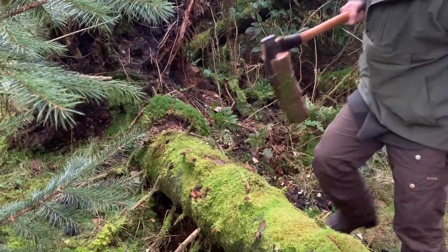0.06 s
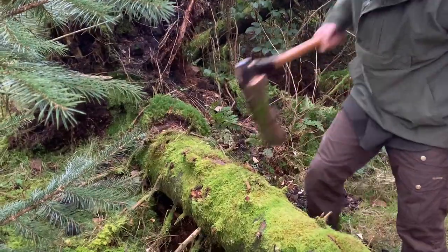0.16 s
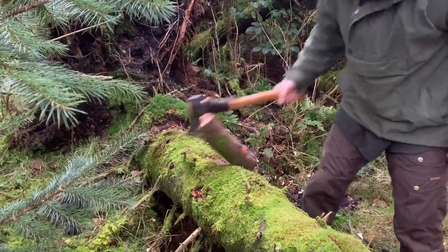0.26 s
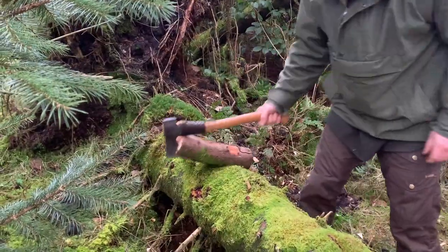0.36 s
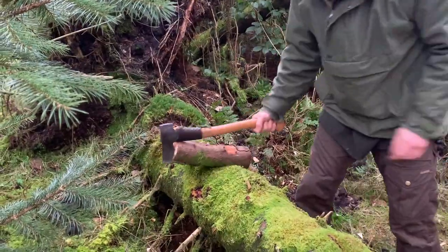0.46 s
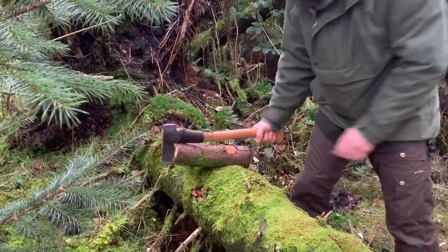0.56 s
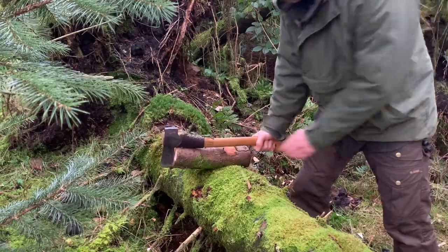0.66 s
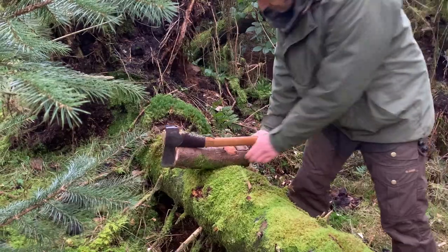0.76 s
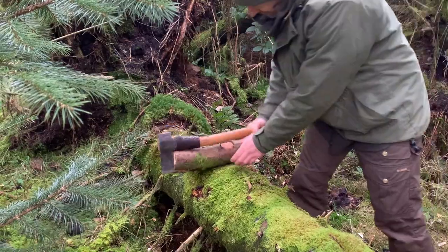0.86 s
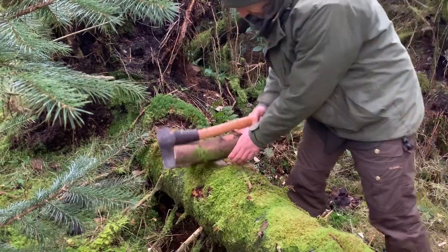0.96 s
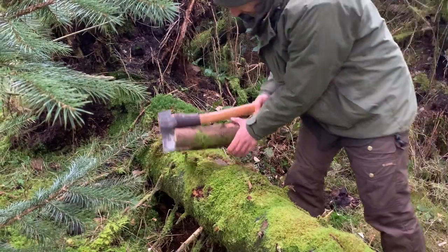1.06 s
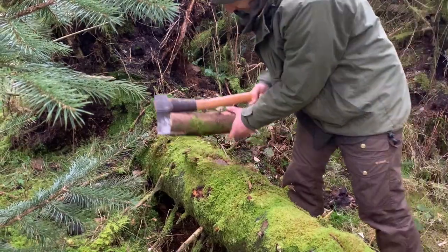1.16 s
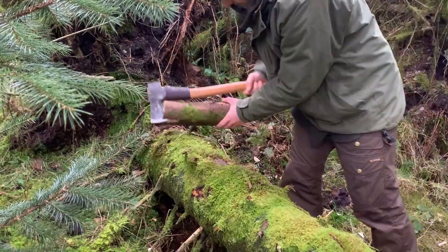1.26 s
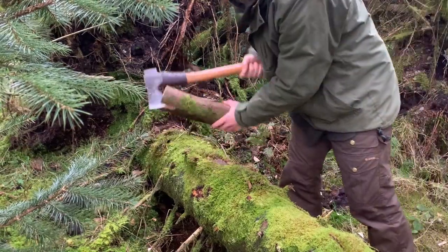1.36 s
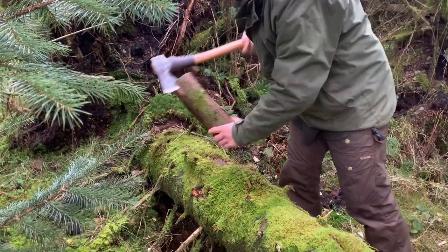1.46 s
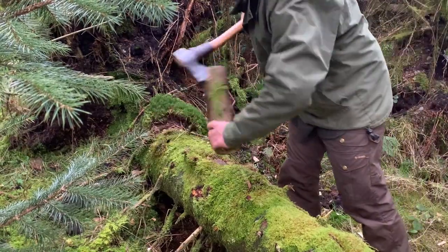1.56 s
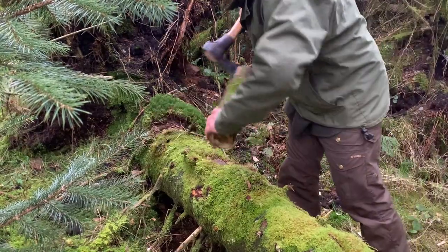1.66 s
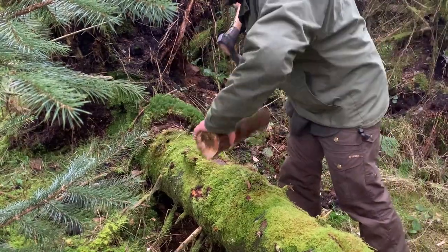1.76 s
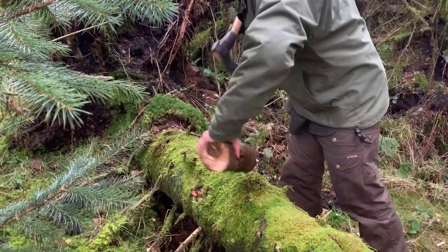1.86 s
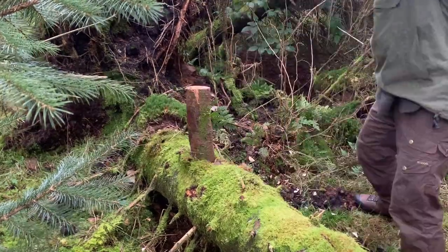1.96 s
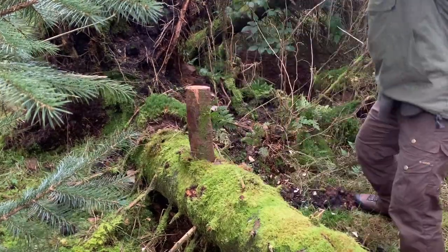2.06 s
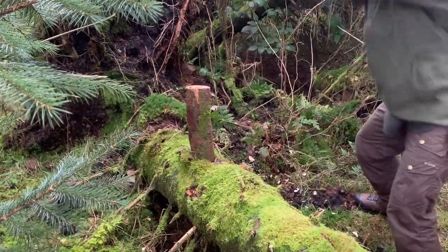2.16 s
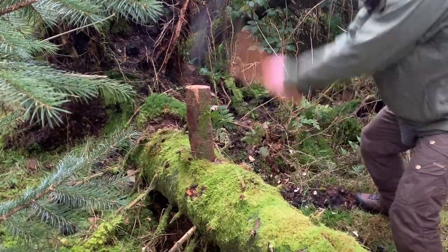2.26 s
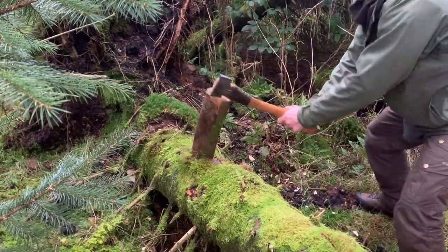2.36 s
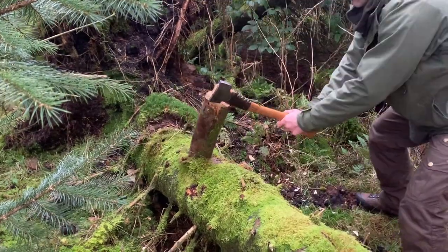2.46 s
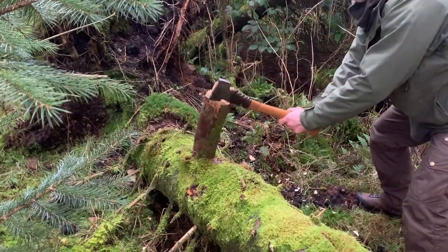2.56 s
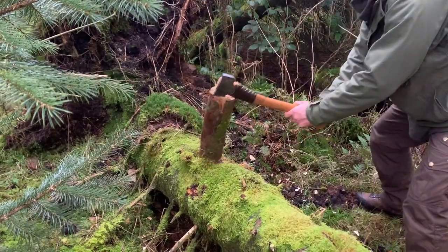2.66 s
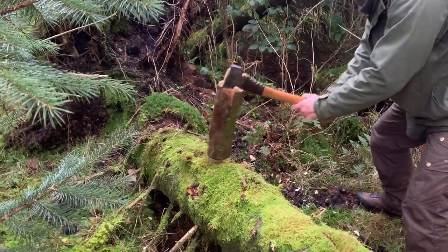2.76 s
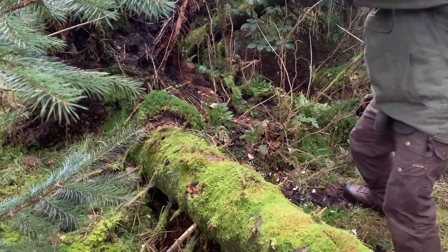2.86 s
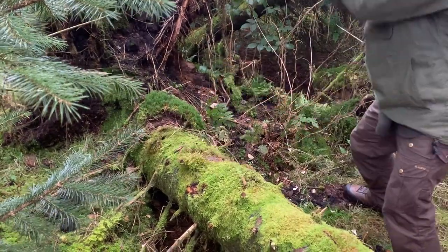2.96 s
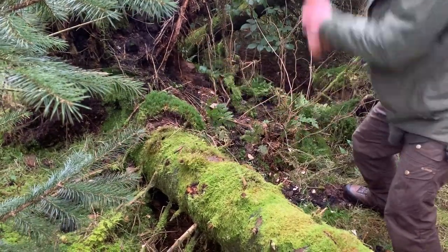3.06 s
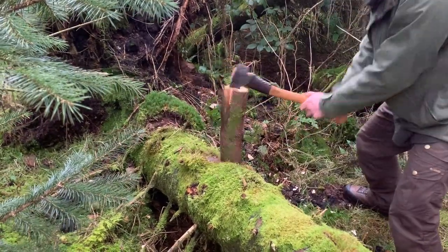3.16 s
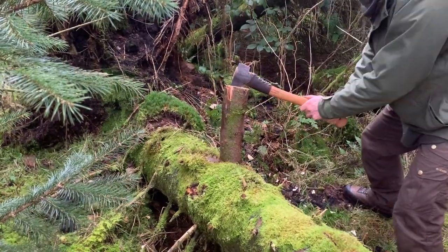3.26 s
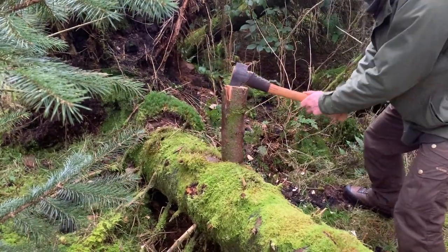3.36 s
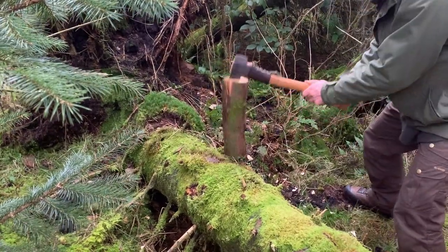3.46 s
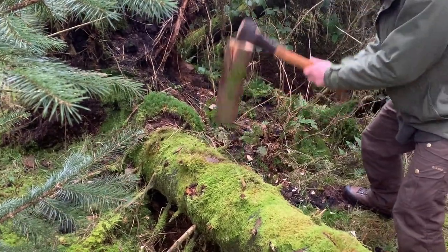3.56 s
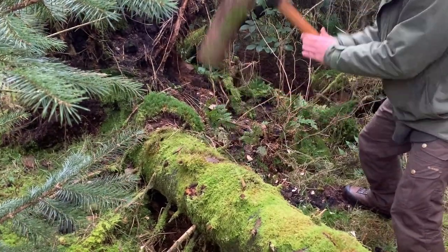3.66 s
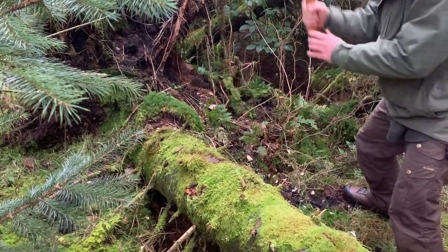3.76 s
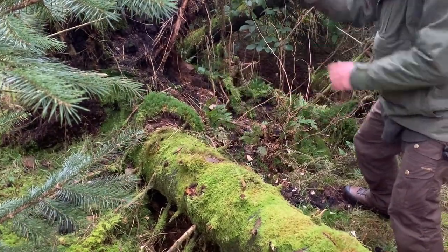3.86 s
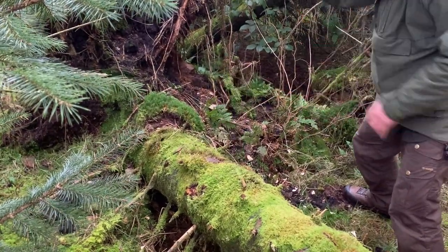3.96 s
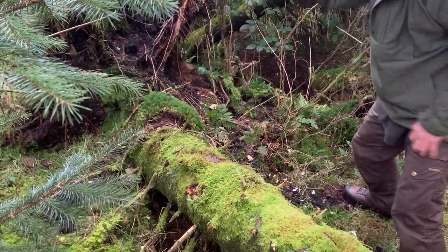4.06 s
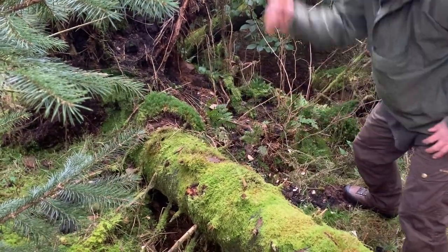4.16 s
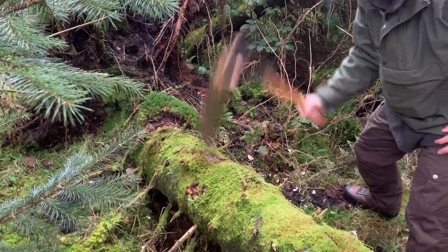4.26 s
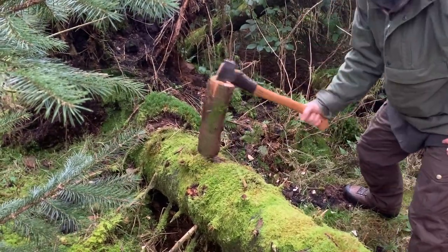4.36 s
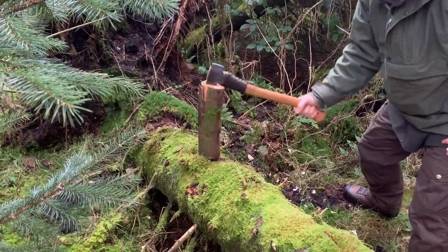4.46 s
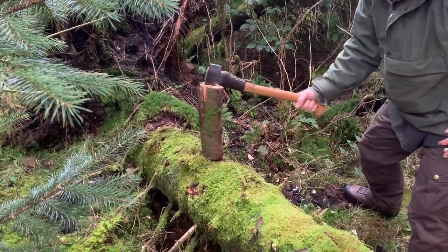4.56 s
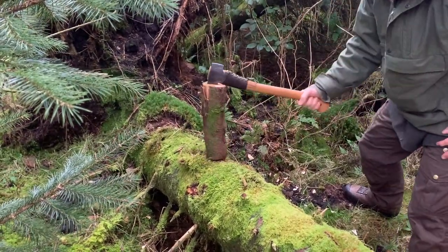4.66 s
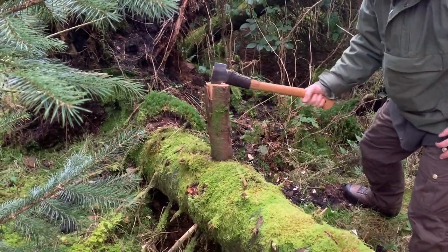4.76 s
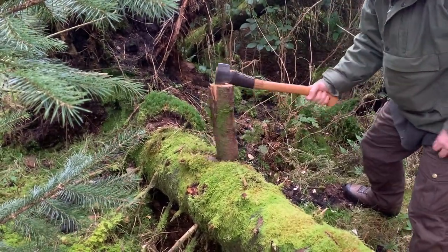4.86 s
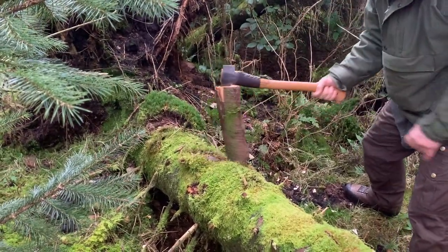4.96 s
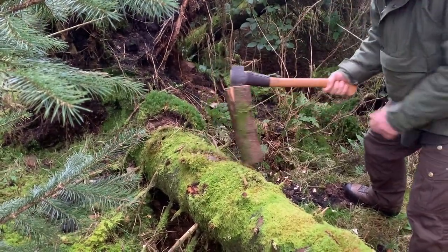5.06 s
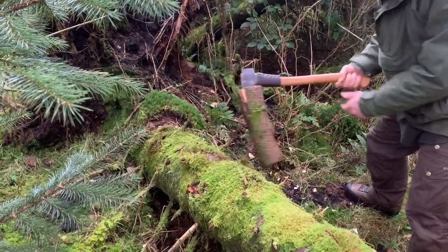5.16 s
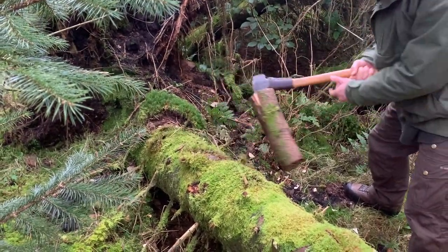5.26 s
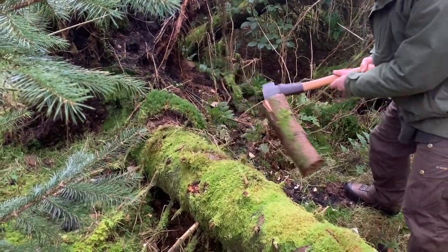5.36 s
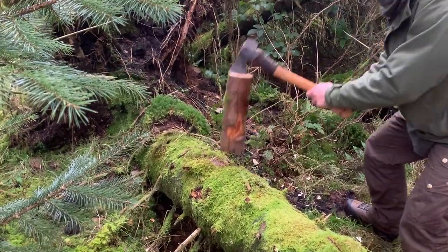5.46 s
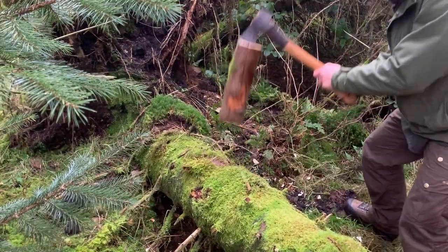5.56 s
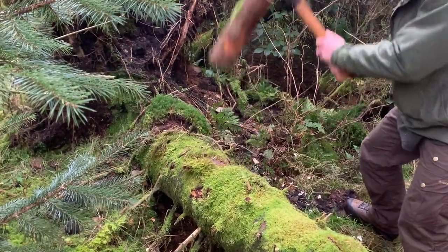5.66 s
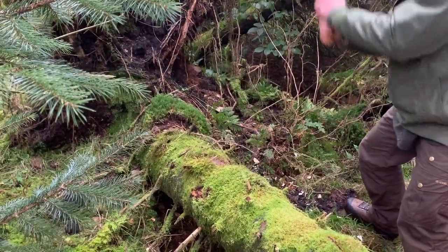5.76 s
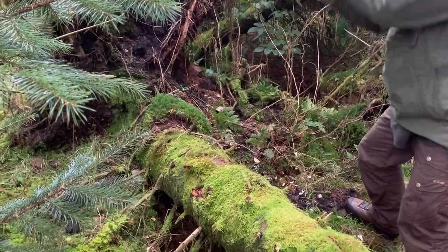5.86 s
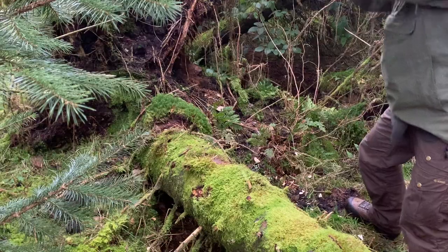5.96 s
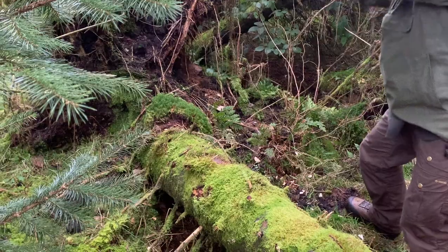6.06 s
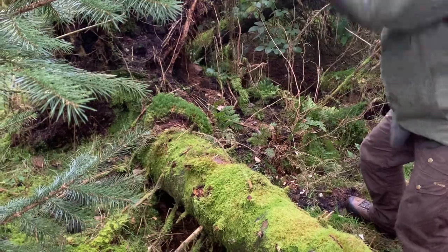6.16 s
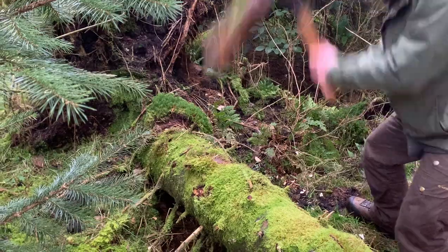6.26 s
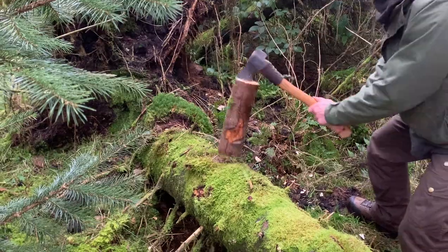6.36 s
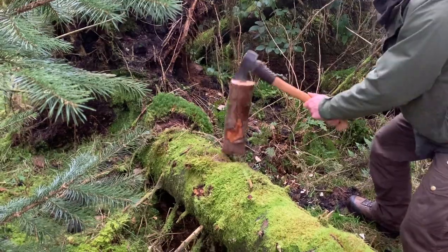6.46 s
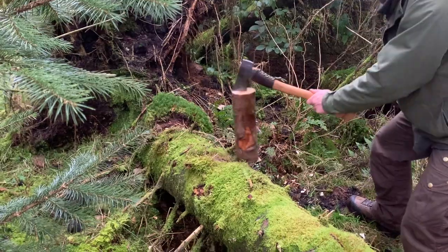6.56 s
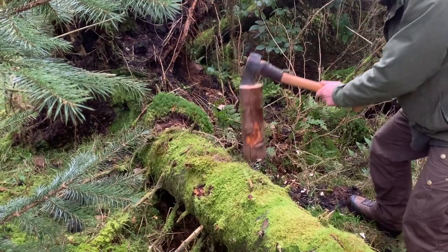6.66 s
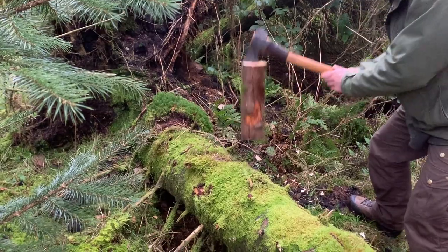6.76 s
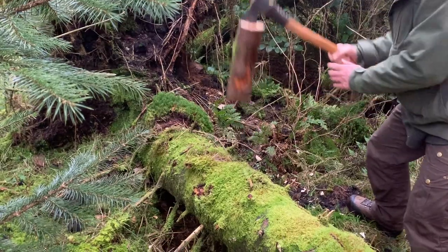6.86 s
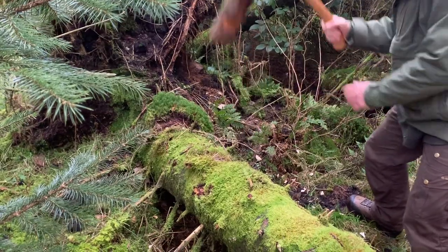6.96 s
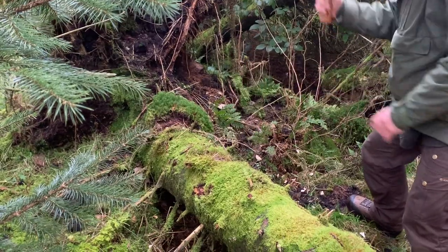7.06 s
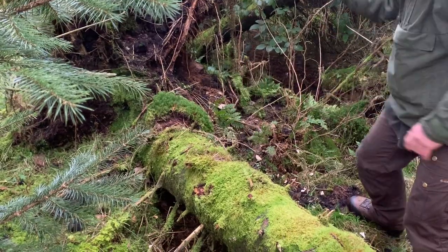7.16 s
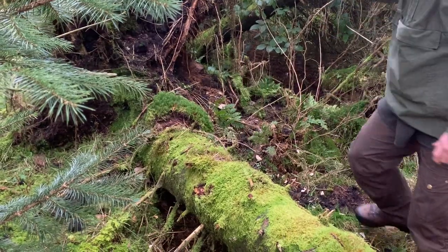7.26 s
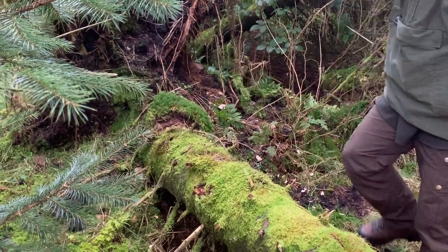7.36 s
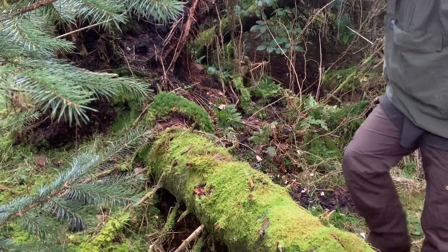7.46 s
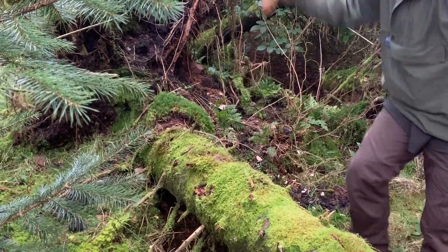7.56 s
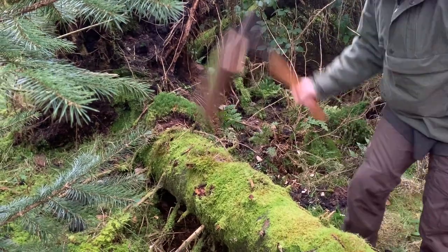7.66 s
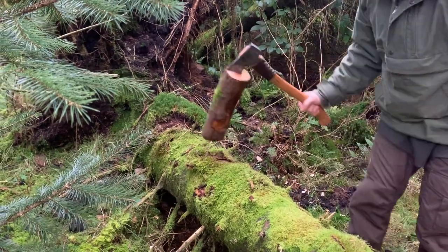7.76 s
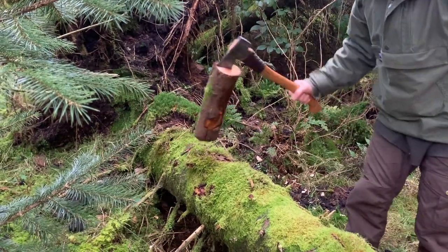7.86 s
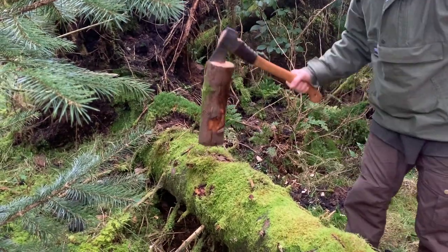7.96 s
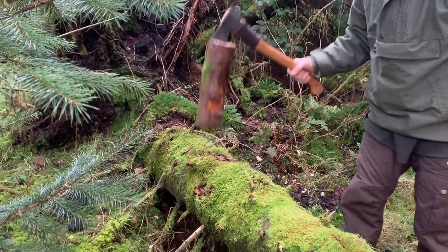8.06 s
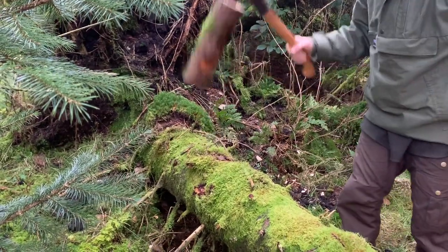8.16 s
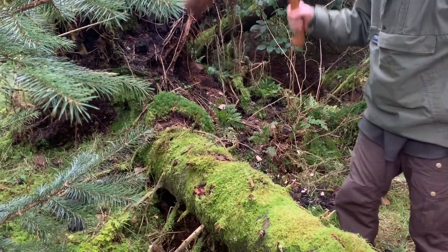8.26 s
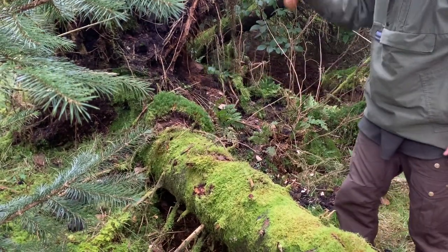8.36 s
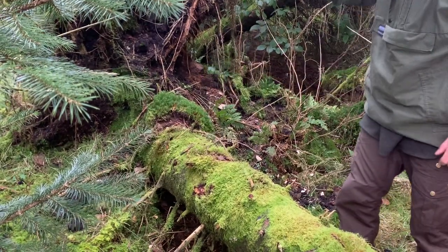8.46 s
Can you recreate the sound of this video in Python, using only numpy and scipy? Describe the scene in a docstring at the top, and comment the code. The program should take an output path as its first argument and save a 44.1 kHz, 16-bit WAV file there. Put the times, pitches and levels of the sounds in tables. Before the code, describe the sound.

A small axe with a log stuck on its blade thuds irregularly on a mossy fallen trunk, woody cracks echoing through quiet woods, clothes rustling.

```python
"""First a faint hiss of still wood and breeze, and a rustle that grows into a blow on a mossy fallen trunk.
A small axe with a short log stuck on its blade strikes: decaying noise for the crack of fibres, damped
modes for the thud of the trunk and knock of the log, scattered taps for the echoes. The log bounces and
drags over bark, twigs tick, a jacket rustles, boots shift in the moss: filtered noise, grains and modes.
A light wind buffets a two-port microphone as lumpy low noise, and a faint low hum comes and goes."""
import sys
import numpy as np
from scipy import signal
from scipy.fft import rfft, irfft, next_fast_len
from scipy.io import wavfile
from scipy.ndimage import uniform_filter1d

SR = 44100
rng = np.random.default_rng(int(sys.argv[2]) if len(sys.argv) > 2 else 0)


def log_audio(samples):
    """Write samples as a 16-bit WAV file to the path given in sys.argv[1]."""
    # one column per channel
    frames = np.atleast_2d(samples).T
    # limit to full scale, then quantise
    limited = np.clip(frames, -1, 1)
    pcm = np.round(limited * 32767).astype(np.int16)
    wavfile.write(sys.argv[1], SR, pcm)


N = 376173  # length [samples]


def amp(db):
    """Decibel law: level to amplitude ratio."""
    return 10 ** (np.asarray(db) / 20)


def evened(x):
    """Normalisation to unit RMS."""
    return x / np.sqrt(np.mean(x ** 2) + 1e-20)


def peaked(x):
    """Normalisation to unit peak."""
    return x / abs(x).max()


def read(points, hz):
    """Interpolation of a spectrum along logarithmic frequency."""
    f, value = np.transpose(points)
    return np.interp(np.log(hz + 1), np.log(f + 1), value)


def add(mix, s, sound):
    """Superposition: a sound joins the mix in place at time s."""
    part = mix[..., round(s * SR):][..., :sound.shape[-1]]
    part += sound[..., :part.shape[-1]]


def coloured(x, spectrum):
    """Linear filtering: each frequency is weighted by a spectrum in dB."""
    gain = amp(read(spectrum, np.fft.rfftfreq(len(x), 1 / SR)))
    return irfft(rfft(x) * gain, len(x))


def swells(rows, column, rise, fall):
    """Incoherent addition: each row swells, holds and fades smoothly, and powers add."""
    power = np.zeros(N)
    for row in rows:
        u = np.linspace(0, 1, round(max(row[1], .01) * SR))
        shape = np.clip(np.minimum(u / max(rise, .01), (1 - u) / max(fall, .01)), 0, 1)
        envelope = amp(row[column]) * np.sin(np.pi / 2 * shape) ** 2
        add(power, row[0], envelope ** 2)
    return np.sqrt(power)


# Coherence of spread sounds at the two ports: (frequency [Hz], left-right likeness [-1 to 1])
LIKENESS = [(60, .85), (290, .84), (640, .6), (1400, .55), (3100, .15), (6800, -.05)]


def partly_alike(left, other, hz):
    """Partial coherence: the right port shares part of the left spectrum, the rest is independent."""
    same = np.clip(read(LIKENESS, hz), -1, 1)[:, None]
    return np.array([left, same * left + np.sqrt(1 - same ** 2) * other])


def hiss(spectrum, gain, patchy_db, flicker_db):
    """Modulated noise: drifting patches in time and pitch, and a flicker common to all pitches."""
    frames, hz = N // 128 + 5, np.fft.rfftfreq(512, 1 / SR)
    a, b, c, d, patches = rng.standard_normal((frames, 257, 5)).T
    patches = uniform_filter1d(patches, 6, axis=0)  # across pitch
    patches = evened(uniform_filter1d(patches, 16, axis=1))  # along time
    flicker = evened(uniform_filter1d(rng.standard_normal(frames), size=4))
    z = partly_alike(a + 1j * b, c + 1j * d, hz)
    z = z * amp(read(spectrum, hz)[:, None] + patchy_db * patches + flicker_db * flicker)
    return gain * evened(signal.istft(z, nperseg=512, noverlap=384)[1][:, :N])


# Spectrum of the still wood: (frequency [Hz], relative density [dB per Hz])
AIR = [(18, -34.5), (30, -5), (65, -6), (146, -6.5), (261, -3.5), (6210, -22.5), (7090, -24), (8750, -21.5),
       (10300, -20.5), (11400, -57), (13000, -26), (14500, -31.5), (16500, -73.5)]
AIR_DB = -70.5


def still_air():
    """Stationary background: faint broadband noise at one mean level."""
    return hiss(AIR, amp(AIR_DB), patchy_db=2.5, flicker_db=1.0)


# Gusts on the ports: (start [s], length [s], level [dB])
GUSTS = [(.2, 0.23, -63), (1.5, 0.45, -67.5), (2.2, .4, -65.5), (3.12, .3, -55.5), (4.04, 0.092, -68),
         (4.18, 0.56, -56.5), (5.43, .17, -48.5), (5.56, 0.22, -50), (5.72, 0.15, -53), (5.84, 0.16, -51),
         (5.97, 0.15, -37), (6.08, .15, -51), (6.17, 0.27, -38), (6.45, 0.25, -55.5), (6.68, 0.24, -51.5),
         (6.87, 0.23, -66), (7.03, 0.2, -50), (7.17, 0.18, -54.5), (7.34, 0.19, -48), (7.45, 0.15, -43.5),
         (7.55, .27, -39.5), (7.8, 0.28, -62.5)]
# Spectrum of the turbulence: (frequency [Hz], relative density [dB per Hz])
WIND = [(12, -42), (20, -21.5), (40, -6.5), (65, 2.5), (121, -14), (194, -28), (250, -36.5), (320, -62.5),
        (550, -120)]
GUST_RISE, GUST_FALL = 0.26, 0.36  # shares of a gust
BREEZE_DB = -77  # floor between gusts


def wind():
    """Turbulent pressure: lumpy low noise, nearly the same on both ports."""
    a, b, lumps = rng.standard_normal((3, N))
    lumps = uniform_filter1d(uniform_filter1d(lumps, size=1500), size=1500)
    lumps = amp(2.5 * evened(lumps))
    a, b = evened(coloured(a, WIND)), evened(coloured(b, WIND))
    force = np.hypot(amp(BREEZE_DB), swells(GUSTS, column=2, rise=GUST_RISE, fall=GUST_FALL))
    return force * evened(lumps) * np.array([a + .3 * b, 1.15 * a - .3 * b])


# Movements of arms and body: (start [s], length [s], jacket level [dB], boots and moss level [dB])
MOVES = [(.36, 0.56, -56.5, -57.5), (.96, 0.1, -65.5, -70), (1.0, 0.29, -69.5, -68.5),
         (1.22, 0.48, -66.5, -84), (1.55, 0.2, -58.5, -76), (1.7, 0.17, -72.5, -77), (1.94, 0.11, -70, -67),
         (2.72, 0.2, -77, -70.5), (3.55, 0.41, -77, -75.5), (3.72, 0.52, -67, -64.5),
         (4.7, 0.3, -65.5, -65.5), (4.88, 0.5, -64.5, -66), (5.42, .24, -74.5, -66.5),
         (5.75, .28, -74.5, -64.5), (6.6, 0.76, -67, -64), (7.2, 0.29, -73.5, -70),
         (7.48, 0.11, -61, -65.5), (8.43, 0.17, -74.5, -68.5)]
MOVE_RISE, MOVE_FALL = 0.31, 0.36  # shares of a movement spent swelling and fading
# Swings of the axe: (blow [s], jacket before [dB], moss before [dB], jacket after [dB], moss after [dB])
SWINGS = [(.223, -74.5, -73.5, -61, -62.5), (2.29, -65, -56.5, -59.5, -57), (3.177, -59, -55, -68, -61),
          (4.303, -67, -58, -63.5, -53.5), (6.321, -64.5, -55, -65.5, -50.5),
          (7.698, -67, -57.5, -63.5, -51.5)]
GROW_DB_PER_S, SETTLE_DB_PER_S = 157, 45
FULL_SWING_S = 0.075  # at full strength for this last moment before the blow
# Scuffs of a boot or the log in the moss: (time [s], level [dB], amplitude decay time [s])
SCUFFS = [(1.01, -65, 0.043), (1.49, -61, 0.03), (1.54, -56.5, 0.035), (1.666, -45, 0.018),
          (1.955, -55, 0.037), (2.83, -55, 0.019), (3.04, -58, .04), (3.982, -54.5, 0.06),
          (4.031, -51, 0.044), (5.096, -52.5, 0.052), (5.22, -59.5, 0.1), (5.45, -59.5, .05),
          (5.808, -62.5, 0.042), (7.111, -54, 0.035), (7.36, -55, .02), (7.424, -58, .02),
          (7.494, -45, .02), (7.53, -44.5, .02), (8.456, -61.5, 0.025)]
SCUFF_RISE_S = 0.015


def stir():
    """Power summation: movements, swings and scuffs set the levels of jacket and moss."""
    t = np.arange(N) / SR
    power = np.array([swells(MOVES, column=k, rise=MOVE_RISE, fall=MOVE_FALL) ** 2 for k in (2, 3)])
    for s, *db in SWINGS:
        before, after = np.reshape(db, (2, 2, 1))
        growing = before + GROW_DB_PER_S * np.minimum(t - s + FULL_SWING_S, 0)
        settling = after - SETTLE_DB_PER_S * (t - s)
        power += amp(np.where(t < s, growing, settling)) ** 2
    for s, db, dying in SCUFFS:
        u = t[:SR // 4]
        scuff = amp(db) * np.minimum(u / SCUFF_RISE_S, 1) * np.exp(-u / max(dying, .003))
        add(power[1], s, scuff ** 2)
    return np.sqrt(power)


def crackle(per_s, spread_db, low_hz, high_hz):
    """Random impulse process: sparse grains of a few cycles, of random size and one of 16 pitches."""
    size = amp(spread_db * np.minimum(rng.exponential(1, N), 5))
    size = size * (rng.random(N) < per_s / SR)
    kind, t, out = rng.integers(0, 16, N), np.arange(400) / SR, np.zeros((2, N))
    for k, hz in enumerate(np.geomspace(low_hz, high_hz, 16)):
        grain = np.sin(2 * np.pi * hz * t) * np.exp(-t * hz / 2.5) * (1 - np.exp(-t * hz * 1.5))
        out[k % 2] += signal.oaconvolve(size * (kind == k), grain)[:N]
    return evened(out + .6 * out[::-1])


# Spectrum of the jacket: (frequency [Hz], relative density [dB per Hz])
JACKET = [(530, -48.5), (900, -8.5), (1190, -5.5), (1910, -5), (3520, -7.5), (6230, -7), (7210, -11.5),
          (8650, -2), (10300, -14), (11900, -41), (12500, -10.5), (14800, -16), (15900, -21),
          (16500, -43.5)]


def jacket(cloth):
    """Sliding friction: a rustle of noise, with fine grains for creases of stiff cloth."""
    rustle = hiss(JACKET, cloth, patchy_db=2.0, flicker_db=-0.73)
    creases = crackle(per_s=1500, spread_db=3.5, low_hz=2000, high_hz=9500)
    return rustle + amp(-9) * cloth * creases


# Spectrum of boots in moss: (frequency [Hz], relative density [dB per Hz])
BOOTS = [(59, -47), (100, -8), (145, -11.5), (252, 5.5), (359, -5), (529, -0.5), (671, -9.5), (1930, -14.5),
         (3500, -24.5), (4550, -44), (7700, -120)]


def boots(moss):
    """Granular friction: dull noise, with grains for needles and bark under boots and log."""
    shuffle = hiss(BOOTS, moss, patchy_db=4.0, flicker_db=1.5)
    grains = crackle(per_s=600, spread_db=3.5, low_hz=700, high_hz=3200)
    return shuffle + amp(-10) * moss * grains


def ring(modes, t):
    """Modal synthesis: the impulse response of a struck body, peak 1."""
    return peaked(sum(amp(db - 60 * t / t60) * np.sin(2 * np.pi * hz * t) for hz, db, t60 in modes))


# Modes of the trunk: (frequency [Hz], relative level [dB], t60 [s], sign at the struck spot)
TRUNK = [(115, -21, .085, 1), (160, -4.5, .042, -1), (202, 0, .02, 1), (290, -9, .04, -1),
         (346, -12.5, .036, -1), (487, -3.5, .022, 1), (596, -13, .024, 1)]


def thud(t, softness, pitch=1):
    """Contact filtering: trunk modes swell over about half a cycle; a soft contact drives only the low ones."""
    hz, db, t60, sign = np.transpose(TRUNK)[:, :, None]
    u, hz = np.maximum(t, 0), hz * pitch
    drive = sign * np.exp(-(hz * softness) ** 2) * (1 - np.exp(-2 * u * hz))
    return peaked((drive * amp(db - 60 * u / t60) * np.sin(2 * np.pi * hz * u)).sum(0))


# Blows and bounces: (time [s], thud level [dB], thud start after the crack peak, negative if before [s],
# softness of contact [s], ground thump re thud [dB], knock of the log re thud [dB], crack re thud [dB],
# crack tilt [dB per octave], rise of the crack before its peak, before limits [s],
# crack decay time [s], splintering re crack [dB],
# distant report re crack and knock [dB], report tilt [dB per octave])
BLOWS = [(0.224, -13.5, -0.00048, 0.0021, -43, -9.5, -7, 2, 0.0017, 0.00075, -17.5, 10.5, 7.5),
         (2.289, -9.5, 0.00073, 0.0013, -23, -1, -1.5, 3, 0.0047, 0.0025, -13.5, 2.5, 2),
         (2.382, -31, -0.0085, 0.0047, -36, -29, -25, -17, .001, .0015, -26, -1, -8),
         (3.1777, -1, -0.003, 0.0021, -22.5, -9, -4.5, 0.5, 0.0024, 0.00066, -15, -1, 0),
         (4.303, 0.5, -0.0011, 0.001, -16.5, -9, -7, 1, 0.0025, 0.00064, -17, 1.5, 3),
         (4.46, -17, 0.00044, 0.004, -22, -10, -15, -4.5, 0.00053, 0.001, -12, 6, -4.5),
         (4.58, -27.5, 0, 0.004, -21.5, -29.5, -30.5, 9, 0.0011, 0.0048, -19, 3, 3),
         (6.323, 0, -0.0055, 0.0013, -12.5, -12, -9, 2.5, 0.0047, 0.00023, -22, -4.5, 1),
         (7.698, -0.5, -0.0007, 0.0013, -13, -19, -8, 0.5, 0.0016, 0.00046, -17.5, 5, 2.5)]
# Spectrum of the crack: (frequency [Hz], relative density [dB per Hz])
CRACK = [(710, -26.5), (1200, -1.5), (4420, -8.5), (6490, 0.5), (7010, -14), (8170, -8), (8640, -11.5),
         (10400, -17), (11600, -28), (12300, -21), (13800, -23.5), (15100, -21), (16500, -46)]
# Modes of the log: (frequency [Hz], relative level [dB], t60 [s])
LOG = [(664, -1, 0.066), (874, -6, 0.11), (983, 6.5, 0.027), (1275, 12.5, 0.016), (1665, 2.5, 0.028),
       (1900, -11, .03), (2700, -8, 0.01), (3220, 2, 0.0083), (4330, -9, 0.043)]
# What the stems throw back: (frequency [Hz], level [dB])
FOLIAGE = [(500, -22.5), (1000, -5.5), (2500, 0), (4000, 0), (6000, -4.5), (8500, -7.5), (10500, -14.5),
           (11500, -30), (13500, -22), (16500, -40)]
THUMP_HZ, THUMP_T60 = 56, 0.047  # ground resonance [Hz], decay [s]


def blows():
    """Impact: fibres crack and fizz; log, trunk and ground ring. Rows: dull, bright, report."""
    out, lead = np.zeros((3, N)), .02  # room before the crack peak [s]
    t = (np.arange(8192) - round(lead * SR)) / SR
    u = np.maximum(t, 0)
    crack_hz, crack_level = np.transpose(CRACK)
    for row, grit in zip(BLOWS, rng.standard_normal((len(BLOWS), len(t)))):
        s, db, thud_start, softness, thump_db, knock_db, crack_db, tilt_db, *rest = row
        rise_s, length, splinter_db, report_db, report_tilt_db = rest

        rise = np.exp(np.minimum(t, 0) / np.clip(rise_s, 2e-4, 3.5e-3))
        fizz = amp(splinter_db) * np.exp(-u / .014)
        burst = rise * (np.exp(-u / max(length, 1e-4)) + fizz)
        colour = np.c_[crack_hz, crack_level + tilt_db * np.log2(crack_hz / 4000)]
        crack = evened(coloured(grit, colour)) * burst

        contact = grit * rise * np.exp(-u / 0.00026)
        knock = peaked(signal.fftconvolve(ring(LOG, t + lead), contact)[:len(t)])
        thump = peaked((1 - np.exp(-u / .006)) * ring([(THUMP_HZ, 0, THUMP_T60)], u))
        dull = thud(t - thud_start, softness) - amp(thump_db) * thump
        bright = amp(knock_db) * knock + amp(crack_db) * crack

        # From afar the crack is one short click
        tilt = [(1000, -2 * report_tilt_db), (16000, 2 * report_tilt_db)]  # across four octaves
        report = coloured(coloured(1. * (t == 0), tilt), FOLIAGE)
        report = amp(report_db) * report * np.linalg.norm(bright) / np.linalg.norm(report)
        add(out, s - lead, amp(db) * np.array([dull, bright, report]))
    return out


# Phase between the ports for near blows: (frequency [Hz], lead of the left port [rad])
PORT_PHASE = [(0, 0), (500, -.4), (1900, -.8), (3600, 1.5), (4700, .9), (5300, 3.1), (7150, 3.1),
              (8500, .5), (10200, -.5), (10900, -2.9), (12400, -3.5), (12900, -5.9), (16200, -7)]
# Balance of the ports for near blows: (frequency [Hz], left re right [dB])
LEAN = [(60, -1.6), (250, -1.7), (600, -3.3), (1400, -1), (2800, -1.3), (5600, -4.5), (9000, -.6)]


def ports(x):
    """Two-port directivity: a near source has its own phase and balance at each pitch."""
    size = next_fast_len(N)
    hz = np.fft.rfftfreq(size, 1 / SR)
    half = amp(read(LEAN, hz) / 2) * np.exp(.5j * np.interp(hz, *np.transpose(PORT_PHASE)))
    return irfft(rfft(x, size) * np.array([half, 1 / half]), size)[:, :N]


BEYOND = 2.5  # extra decay past the edge of the stand, in multiples of the decay within


def echoes(x, decays, start, edge_s):
    """Multiple scattering: random taps from start [samples], each band dying at its own speed, faster past edge_s."""
    taps = np.zeros((2, SR))
    slots = np.arange(start, SR - 20, 20)
    at = slots + rng.integers(0, 20, (2, len(slots)))
    np.put_along_axis(taps, at, rng.choice([-1., 1.], at.shape), 1)
    hz, t, z = signal.stft(taps, SR, nperseg=256)
    z = partly_alike(z[0], z[1], hz)
    aged = t + BEYOND * np.maximum(t - edge_s, 0)
    decay = amp(-60 * aged / read(decays, hz)[:, None])
    tail = signal.istft(z * decay, SR, nperseg=256)[1]
    return signal.fftconvolve(x[None], tail / np.linalg.norm(tail[0]), axes=1)[:, :N]


GROUND_DB = -23.5


def near_echoes(dull, report):
    """Early reflection: ground and close stems answer with a short tail."""
    decays = [(100, 0.11), (1000, 0.088), (10000, 0.019)]  # (frequency [Hz], t60 [s])
    return amp(GROUND_DB) * echoes(dull + report, decays, start=200, edge_s=1)


# Echoes scattered by the trees: (frequency [Hz], t60 [s])
TREES = [(100, 0.37), (300, 0.19), (1000, 0.8), (3000, 0.57), (5000, 0.28), (8000, .45), (16000, 0.6)]
TREES_LOW_DB, TREES_HIGH_DB = -36.5, -30  # returned thud and returned report


def far_echoes(dull, report):
    """Late reverberation: the stand of trees returns a longer tail."""
    sent = amp(TREES_LOW_DB) * dull + amp(TREES_HIGH_DB) * report
    return echoes(sent, TREES, start=900, edge_s=0.28)


# Ticks of twigs, bark and axe: (time [s], snap level before decay [dB], pitch [Hz],
# wooden body re snap [dB], left re right [dB], band width before limits [octaves], decay time [s])
TICKS = [(0.307, -49, 2300, -6, -11, 2, 0.0033), (0.319, -47, 1900, -17, 19, 1.7, 0.0018),
         (0.328, -48, 3500, -13, -7, 2.4, 0.0047), (0.3497, -39, 4700, -33, -2, 2, 0.0027),
         (0.552, -33, 1270, -20, -3, 0.33, 0.0028), (0.561, -53, 500, 10, 1, 0.87, 0.0017),
         (1.012, -61.5, 500, 7, -1, 1.3, .003), (1.394, -48.5, 2900, -14, -3, 2.8, 0.0026),
         (1.432, -54.5, 2290, -26, -5, 0.71, 0.0027), (1.6312, -47, 4300, -30, -10, 0.71, .0015),
         (1.645, -44, 5000, -30, 1, 1.8, .0012), (1.6489, -34, 4930, -33, -5, 1.6, 0.0019),
         (1.66, -34.5, 2500, -17, -1, 2.6, 0.0028), (1.67, -43.5, 5000, -12, -5, 1.6, 0.0026),
         (1.685, -37, 2780, -7, 0, 1.5, 0.0033), (1.7874, -58, 800, 1, 3, 2.4, 0.0028),
         (2.675, -52, 746, -1, -4.5, 0.9, 0.0027), (2.833, -49.5, 803, -3, -2, 0.94, 0.0036),
         (3.041, -49, 1800, -7.5, -10, 0.45, 0.003), (3.448, -56, 4940, -21.5, -0.5, 1, 0.0031),
         (3.987, -50.5, 1300, -3.5, -5, 1.2, 0.0016), (4.0354, -58, 800, 14, -2, 1, .003),
         (4.485, -50, 8300, -17, 2, 0.78, 0.0018), (4.811, -41.5, 3480, -37, -1.5, 2.25, 0.0018),
         (4.831, -48.5, 4000, -20, 0.5, 2, .0012), (4.8557, -37.5, 3280, -1.5, 1.5, 2.2, 0.0019),
         (4.881, -51.5, 8500, -18, -3, 0.32, 0.0024), (4.972, -59, 4600, -11, -3, 1.6, 0.0021),
         (5.017, -48, 1990, -20, 2, 0.92, 0.0022), (5.1, -50, 940, -20, -2, 1.1, 0.0085),
         (5.167, -52.5, 1700, -14, -4, 1.1, 0.0067), (5.28, -55.5, 1316, -8.5, -3.5, 1.3, .004),
         (5.223, -54, 800, 2, -3, 0.99, 0.0042), (6.513, -42, 6000, -27, -1, 1.7, 0.0018),
         (6.916, -51.5, 5000, -15, -0.5, 2.4, 0.0011), (7.081, -51.5, 5000, -19, -2.5, 0.83, 0.0016),
         (7.121, -52.5, 3590, -9.5, -9, 1.4, 0.0019), (7.135, -53, 6000, -15, -2, 4.7, .005),
         (7.368, -52, 2200, 3.5, -4, 1.6, .002), (7.491, -53, 3010, -6.5, -7.5, 1.6, .003),
         (7.501, -47.5, 2730, 8, -4, 0.72, 0.0061), (7.5334, -37.5, 3150, -1, -5, 2.8, 0.0019),
         (7.541, -51.5, 3000, -11, -7, 0.82, 0.0066), (8.15, -68, 3812, 2, 0.5, 0.56, .0015),
         (8.473, -65.5, 997, 10, 4.5, 1.16, 0.0026)]


def ticks():
    """Band-limited transient: a snap of noise about its own pitch, with a short wooden knock."""
    out, t = np.zeros((2, N)), np.arange(2048) / SR
    for row, grit in zip(TICKS, rng.standard_normal((len(TICKS), 2, len(t)))):
        s, db, hz, body_db, pan_db, octaves, length = row
        half_width = np.clip(octaves, .15, 3) * np.array([-.5, .5])
        edges = np.clip(hz * 2 ** half_width, 200, SR / 2.2)
        band = signal.butter(2, edges, "bandpass", fs=SR, output="sos")
        snap = evened(signal.sosfilt(band, grit + 0.13 * grit[::-1]))
        snap = snap * (1 - np.exp(-t / 0.0001)) * np.exp(-t / max(length, 2e-4))
        body = thud(t, 0.00066, pitch=1.336)
        pan = amp([[pan_db / 2], [-pan_db / 2]])
        add(out, s, amp(db) * (snap + amp(body_db) * body) * pan)
    return out


# Strokes of the log over bark: (start [s], length [s], level before the port balance [dB],
# scrape pitch at the start [Hz], at the end [Hz])
DRAG = [(.36, 0.062, -62.5, 1460, 1430), (0.425, 0.14, -60, 1140, 1550), (0.571, .03, -53, 1300, 1230),
        (0.727, 0.087, -61, 1390, 947), (4.999, 0.06, -60.5, 1325, 1310), (5.063, .14, -64, 1400, 1680),
        (5.2, 0.13, -69.5, 1470, 1345)]


def drag():
    """Friction-driven resonance: clumped grains pass a resonance that slides as the log turns."""
    start, length, _, first_hz, last_hz = np.transpose(DRAG)
    times = np.c_[start, start + length].ravel()
    hz = np.interp(np.arange(N) / SR, times, np.c_[first_hz, last_hz].ravel())
    noise, clumps = rng.standard_normal((2, N))
    grains = noise * amp(2.3 * evened(uniform_filter1d(clumps, size=400)))
    # Shift the moving pitch to zero, smooth twice, shift back
    turn, r = np.exp(2j * np.pi * np.cumsum(hz) / SR), np.exp(-np.pi * 250 / SR)
    smooth = signal.lfilter([1 - r], [1, -r], grains / turn)
    smooth = signal.lfilter([1 - r], [1, -r], smooth)
    rung = (turn * smooth).real
    return swells(DRAG, column=2, rise=0.25, fall=0.15) * evened(rung) * amp([[-5], [-3]])


# Swells of the hum: (start [s], length [s], level [dB])
HUM = [(2.829, 1.55, -66)]
HUM_HZ = 73.6


def hum():
    """Narrow-band noise: one low band comes and goes faintly."""
    band = signal.butter(4, [HUM_HZ - 12, HUM_HZ + 12], "bandpass", fs=SR, output="sos")
    tone = evened(signal.sosfilt(band, rng.standard_normal(N)))
    return swells(HUM, column=2, rise=.06, fall=.15) * tone


def scene():
    """Superposition: all sources add at the two ports."""
    background = still_air() + wind()
    cloth, moss = stir()
    body = jacket(cloth) + boots(moss)
    dull, bright, report = blows()
    struck = ports(dull + bright) + near_echoes(dull, report) + far_echoes(dull, report)
    return background + body + struck + ticks() + drag() + hum()


EDGE_HZ = 16500  # band limit


def record(dry):
    """Soft saturation: the preamp rounds off strong peaks; then a low-pass filter limits the band."""
    ceiling = .89
    soft = ceiling * np.tanh(dry / ceiling)
    low_pass = signal.firwin(511, EDGE_HZ, window=("kaiser", 9), fs=SR)
    return signal.oaconvolve(soft, low_pass[None], "same")


dry = scene()
out = record(dry)
log_audio(out)
```